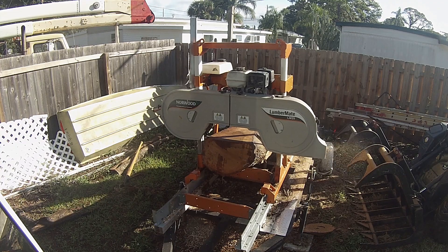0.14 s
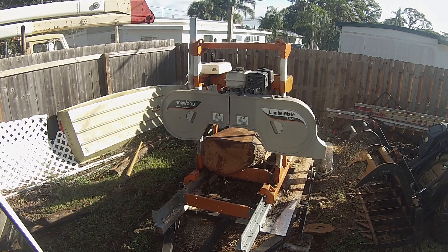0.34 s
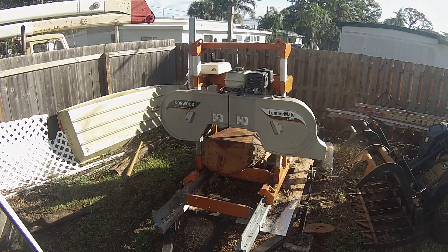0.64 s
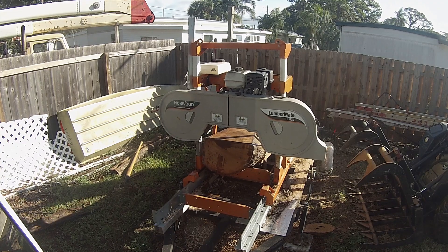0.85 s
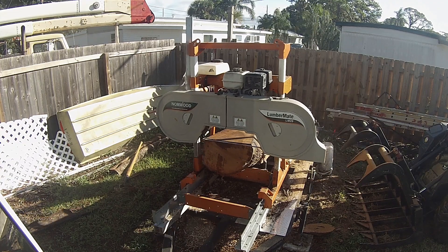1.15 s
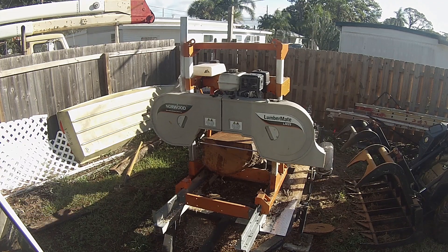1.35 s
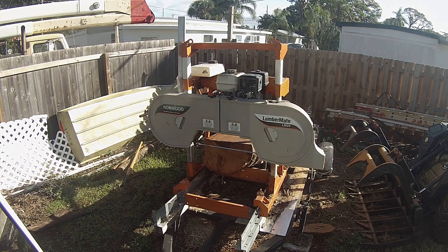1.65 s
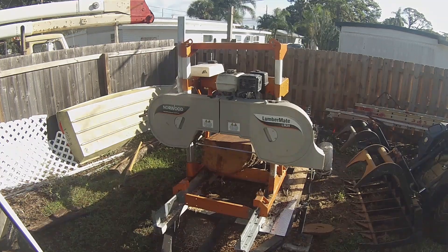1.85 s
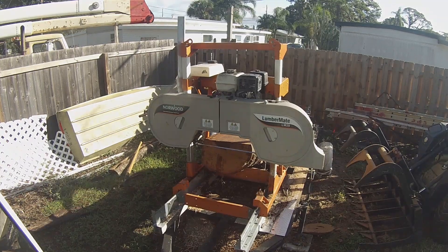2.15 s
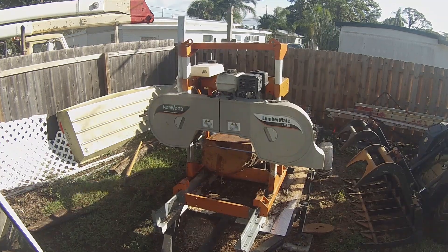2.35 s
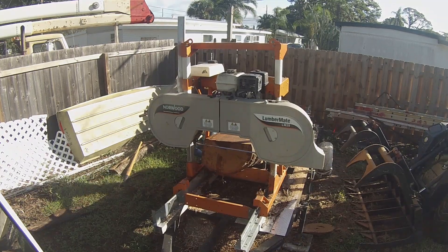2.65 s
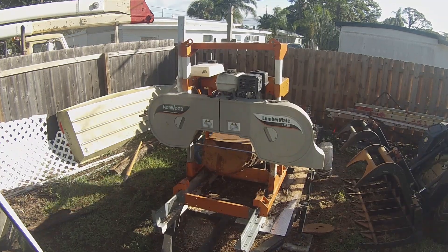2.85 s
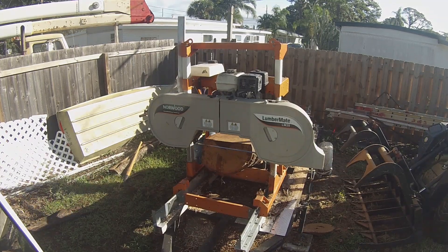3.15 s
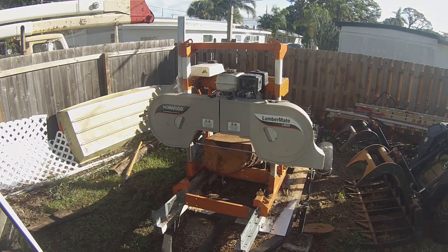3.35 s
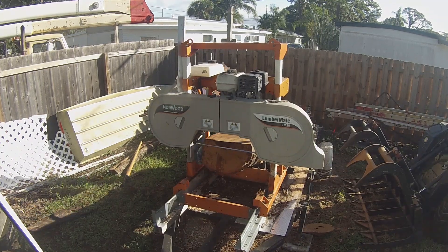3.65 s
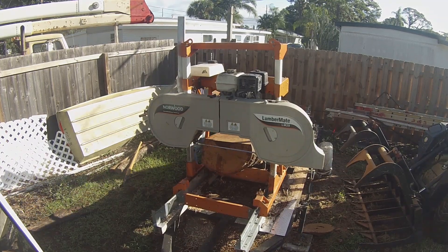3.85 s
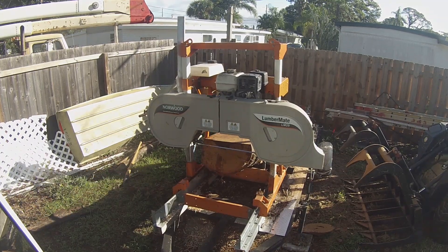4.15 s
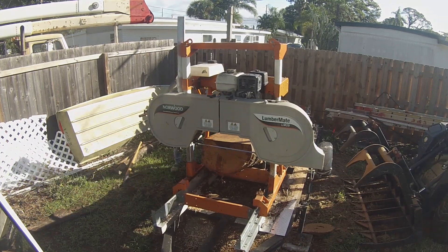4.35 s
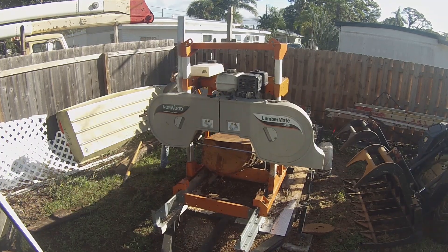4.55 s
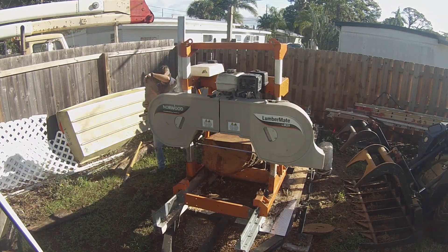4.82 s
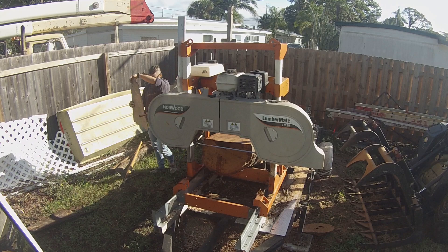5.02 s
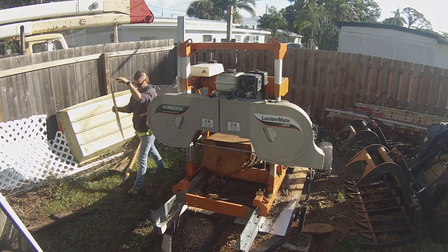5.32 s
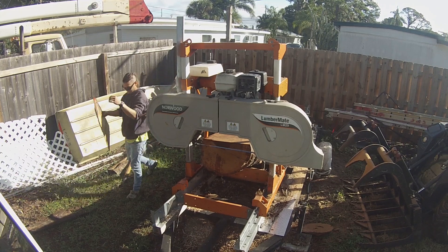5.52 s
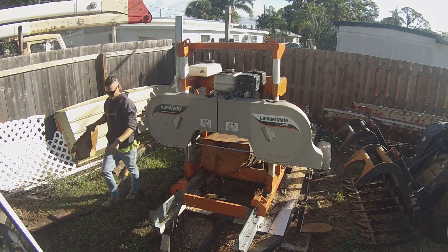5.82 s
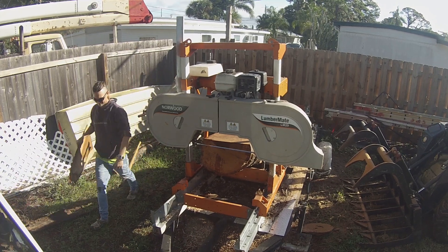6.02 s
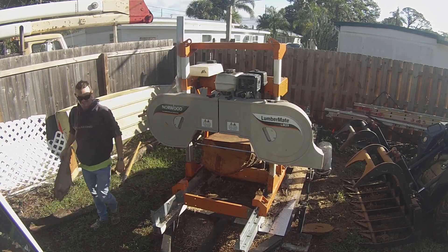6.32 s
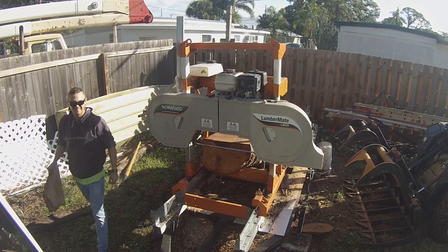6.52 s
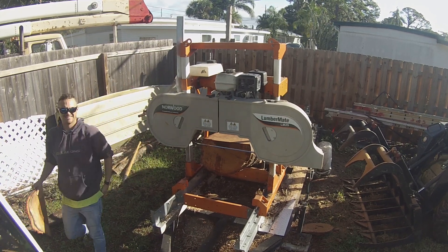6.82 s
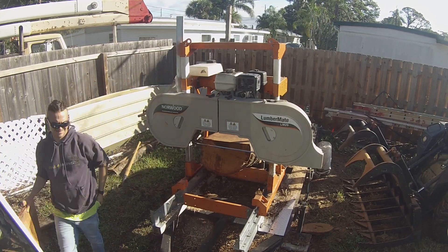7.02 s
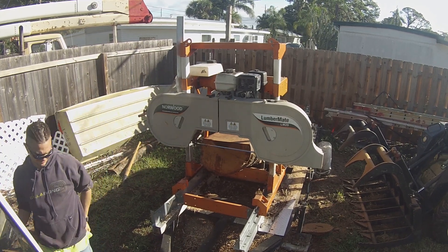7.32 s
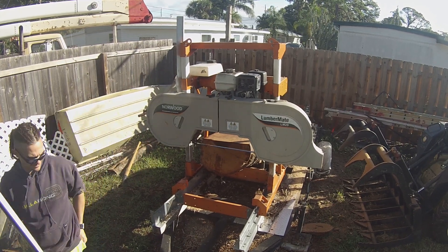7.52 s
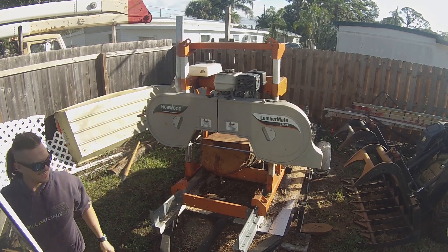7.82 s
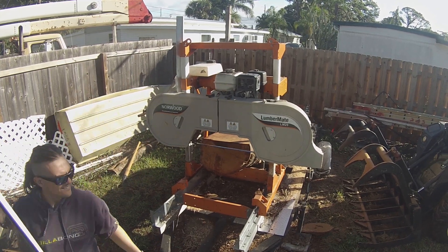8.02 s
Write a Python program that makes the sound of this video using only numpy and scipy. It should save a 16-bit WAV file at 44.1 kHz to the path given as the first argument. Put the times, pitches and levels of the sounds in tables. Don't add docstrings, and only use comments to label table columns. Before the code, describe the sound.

Quiet sawing hiss and engine drone slow, then cut abruptly to a close, rattling single-cylinder idle with wind thumps on the microphone.

```python
import sys
import numpy as np
from scipy import signal
from scipy.fft import rfft, irfft, next_fast_len
from scipy.io import wavfile
from scipy.ndimage import uniform_filter1d

SR = 44100
rng = np.random.default_rng(int(sys.argv[2]) if len(sys.argv) > 2 else 0)


def unload_audio(sound):
    columns = np.transpose(np.atleast_2d(sound))
    steps = np.round(np.clip(columns, -1, 1) * 32767)
    wavfile.write(sys.argv[1], SR, steps.astype(np.int16))


def nominal_scale(level):
    x = np.asarray(level, float) / 20
    return 10 ** x


N = 360285

CHANGE_S = 1.8375

# time_s, rate_firings_per_s
CUT_SPEED = [
    (0, 29.2),
    (.35, 29.5),
    (.7, 29.1),
    (1.0, 29.4),
    (1.18, 29.5),
    (1.37, 26.1),
    (1.47, 23.3),
    (1.83, 19.1),
]
# multiple, level_db
CUT_ORDERS = [(1, -15), (2, -2), (4, -13), (5, 0), (6, -2), (8, -8), (10, -6), (11, -2), (12, -5), (20, -1),
              (24, -8), (40, -9)]
# pitch_hz, level_db (per Hz)
CUT_ROAR_SPECTRUM = [(30, -18), (60, -14), (95, -29), (150, -1.5), (230, -4.5), (330, 0.5), (420, -6),
                     (590, 1), (660, -6), (740, -4), (1000, -8.5), (1170, -5), (1500, -13), (2600, -28)]
# pitch_hz, level_db (per Hz)
CUT_HISS_SPECTRUM = [(1410, -38), (2400, -31), (2660, -7), (2740, -6), (2970, -3), (3130, -1), (4020, -5.5),
                     (5130, -14.5), (6700, -4), (7410, -10.5), (9980, -6), (13900, -15), (15600, -23)]
# centre_s, level_db, length_s
BITE = [
    (.82, 1.5, 0.054),
    (.97, 1.5, .03),
    (1.2, -2, 0.22),
]

# pitch_hz, level_db (per Hz)
WIND_SPECTRUM = [(12, -14), (24, 0), (45, 0), (70, -5), (100, -7), (200, -15), (400, -30)]
# centre_s, level_db (peak), length_s
GUSTS = [(1.35, -65, .25), (1.93, -34, .03), (2.05, -33, .04), (2.2, -36, .06), (2.37, -24, 0.038),
         (2.62, -36, 0.065), (3.33, -36, .04), (3.43, -28, 0.023), (3.92, -42, 0.068), (4.225, -20.5, .015),
         (4.46, -27.5, 0.059), (4.62, -30.5, .06), (5.02, -40, 0.083), (5.24, -30, .03), (5.35, -25, 0.032),
         (5.5, -22.5, 0.05), (5.68, -36, .03), (6.34, -40, .03), (6.86, -31, .07), (7.02, -26, 0.019),
         (7.15, -29, 0.076), (7.33, -30, 0.041), (7.52, -34, 0.058), (7.66, -27, .03), (7.76, -28, 0.06),
         (7.87, -22, 0.038), (8.0, -24.5, 0.047), (8.13, -34, 0.024)]

# time_s, lead_ms (firings ahead of an even beat)
GOVERNOR_LEAD = [(1.95, -13.4), (2.8, -9.1), (3.4, -9.0), (3.85, -6.9), (4.25, -4.2), (4.5, -4.1),
                 (4.95, -5.5), (5.3, -5.0), (5.75, -4.7), (6.5, -7.5), (6.95, -8.2), (7.55, -8.1),
                 (7.95, -9.7)]
# share_of_cycle, level_db
THUMPS = [
    (.955, 0),
    (.32, -12),
    (.56, -19),
]
# pitch_hz, width_hz, level_db
CHAMBER = (156, 88, -28.0)
# share_of_cycle, level_db
GAS_PULSES = [
    (.05, 0),
    (.17, -9),
    (.41, -14),
    (.68, -4),
]
# pitch_hz, level_db, t60_s
PIPE_MODES = [(269.5, -1.5, 0.2), (315.6, 4, 0.057), (326.5, 11.5, 0.086), (313.5, 9, 0.03),
              (417, -6.5, 0.12), (543.3, -5.5, 0.18), (558, -1, 0.11), (582, -0.5, 0.15), (694, -3.5, 0.11),
              (737, -10.5, 0.3), (811.5, -12.5, 0.14), (1155.5, -4.5, 0.22), (1250, -18, 0.062)]
# multiple, level_db (at the change), growth_db_per_s, loudest_share_of_cycle
FRAME_ORDERS = [(13, -33.5, .55, .6), (20, -38, .7, .8), (25, -43, -.8, .55)]
# pitch_hz, width_hz, level_db (at the change), growth_db_per_s
PANELS = [(826, 12, -45, 0), (1036, 8, -39.5, 0), (1145, 16, -40.5, 0), (2095, 60, -51, 1.2),
          (3480, 50, -50, .3), (3965, 35, -53, .3)]
# pitch_hz, level_db (per Hz)
RUMBLE_SPECTRUM = [(60, -14), (90, -13), (165, -11), (220, -6), (290, -6), (345, -4), (395, -12), (470, -7),
                   (525, -5), (565, 0), (630, -5), (730, -3), (820, -6), (900, -12)]
# pitch_hz, level_db (per Hz)
CASING_SPECTRUM = [(500, -25), (850, -0.5), (953, 5.5), (1020, 7.5), (1160, 7), (1250, 7), (1460, 6.5),
                   (1590, -1.5), (1790, -4.5), (2090, -7.5), (2360, -9.5), (2650, -16), (2800, -9.5),
                   (3640, -13), (6160, -120)]
# share_of_cycle, rattle_ms, cover_db, cowl_db
VALVE_CONTACTS = [(.12, 2, -7, -6), (.2, 3, -6, -9), (.295, 3, -5, 0), (.35, 3, -3, -6), (.48, 2, -7, -5),
                  (.56, 3, 0, -7), (.62, 3, -3, -4), (.8, 3, -6, -1), (.845, 4, -1, -4)]
# pitch_hz, width_hz, level_db
SHROUD_MODES = [(2090, 160, -8), (3100, 250, -2), (3430, 220, 0), (3960, 100, -7), (6170, 70, 0),
                (6350, 300, -6), (8770, 50, -6), (9060, 200, -1), (9350, 300, -3), (10500, 400, -3),
                (11100, 500, -7), (10120, 70, .5), (9800, 500, -15)]
# centre_s, level_db, length_s
SHAKES = [(1.95, -4, 0.059), (2.55, 2.5, 0.041), (2.82, -3, 0.086), (3.3, -2.5, 0.065), (3.45, 4.5, 0.018),
          (3.67, -9.5, 0.055), (4.05, -6.5, 0.079), (4.36, -8, .07), (4.55, 4.5, 0.046),
          (5.29, -3.5, 0.038), (6.62, -4, 0.042), (7.2, 4.5, 0.017), (8.0, -2.5, 0.03), (8.12, 3.5, 0.05)]
# pitch_hz, level_db (per Hz)
FAN_BLADE_SPECTRUM = [(1470, -69), (2500, -15), (2690, -15.5), (3190, -4), (5170, -18), (5690, -19.5),
                      (6160, -8), (7540, -15), (9110, -9), (9680, -14), (10900, -9.5), (12500, -29.5),
                      (16200, -53), (22000, -120)]
# pitch_hz, level_db (per Hz)
RUB_SPECTRUM = [(10000, -14), (11500, -3), (13300, 0), (14200, -3), (15600, -4)]


def seconds():
    return np.arange(N) / SR


def since_change():
    return seconds() - CHANGE_S


def rms_one(x):
    return x / np.sqrt(np.mean(x ** 2) + 1e-20)


def in_time(rows):
    time_s, *columns = np.transpose(rows)
    return [np.interp(seconds(), time_s, column) for column in columns]


def drift(rate):
    r = np.exp(-80 * np.pi * rate / SR)
    noise = rng.standard_normal(N // 40 + 2002)
    slow = signal.lfilter([1], [1, -2 * r, r * r], noise)[2000:]
    return np.interp(np.arange(N) / 40, np.arange(len(slow)), rms_one(slow))


def swells(rows, gain):
    t = np.arange(0, N + 40, 40) / SR
    total = sum(gain(size) * np.exp(-.5 * ((t - centre_s) / max(length_s, .01)) ** 2)
                for centre_s, size, length_s in rows)
    return np.interp(seconds(), t, total)


def coloured(spectrum):
    hz, db = np.transpose(spectrum)
    size = next_fast_len(N)
    bins = np.arange(1, size // 2 + 2) * SR / size
    gain = nominal_scale(np.interp(np.log(bins), np.log(hz), db, left=-90, right=-90))
    return rms_one(irfft(rfft(rng.standard_normal(size)) * gain, size)[:N])


def resonate_twice(x, hz, width):
    r = np.exp(-np.pi * width / SR)
    poles = [1, -2 * r * np.cos(2 * np.pi * hz / SR), r * r]
    for _ in range(2):
        x = signal.lfilter([1, 0, -1], poles, x) * (1 - r * r) / 2
    return x


def strikes(cycles, share, level_db, uneven_db):
    at = np.searchsorted(cycles, np.arange(-6, 120) + share)
    clicks = np.full(N + 1, 1e-18)
    clicks[at] = nominal_scale(level_db + uneven_db * rng.standard_normal(len(at)))
    return clicks[:N]


def cutting():
    per_s, = in_time(CUT_SPEED)
    cycles = np.cumsum(per_s) / SR
    slower_db = 20 * np.log10(per_s / 29.3)
    bite_db = swells(BITE, float)
    tones = np.zeros(N)
    for multiple, level_db in CUT_ORDERS:
        fall = 8.0 if multiple > 2 else 14.0
        order_db = level_db + fall * slower_db + 2.5 * drift(10)
        tones += nominal_scale(order_db) * np.sin(2 * np.pi * (multiple * cycles + rng.random()))
    throb_db = 0.49 * np.cos(2 * np.pi * cycles) + 0.74 * drift(25)
    roar_db = -46 + 1.84 * slower_db + 1.1 * bite_db + throb_db
    lap_db = 0.7 * np.cos(2 * np.pi * 4.3 * (seconds() - 0.1))
    hiss_db = -60.5 + 1.2 * slower_db + bite_db + lap_db + 0.84 * drift(30)
    roar = nominal_scale(roar_db) * coloured(CUT_ROAR_SPECTRUM)
    hiss = nominal_scale(hiss_db) * coloured(CUT_HISS_SPECTRUM)
    return nominal_scale(-53.5) * tones + roar + hiss


def wind():
    rumble = coloured(WIND_SPECTRUM)
    rumble = rumble / np.sqrt(uniform_filter1d(rumble ** 2, size=2500) + .05)
    calm = np.where(since_change() > 0, nominal_scale(-49.0), nominal_scale(-72.0))
    level = calm + swells(GUSTS, nominal_scale)
    return level * nominal_scale(2.3 * drift(33)) * rumble


def thump(cycles):
    hz, width, level_db = CHAMBER
    firing = sum(strikes(cycles, share, db, uneven_db=1.1) for share, db in THUMPS)
    push = signal.lfilter(np.hanning(130), 1, firing)
    late = np.roll(push, int(.012 * SR))
    low = nominal_scale(-15.0) * resonate_twice(late, 82.5, 59) + nominal_scale(-15.5) * resonate_twice(late, 55, 33)
    return nominal_scale(level_db) * rms_one(resonate_twice(push, hz, width) + low)


def exhaust(cycles):
    out = np.zeros(N)
    for k, (hz, level_db, t60_s) in enumerate(PIPE_MODES):
        clicks = sum(strikes(cycles, share, level_db + db, uneven_db=1.2) for share, db in GAS_PULSES)
        r = nominal_scale(-60 / (t60_s * SR))
        w = 2 * np.pi * hz / SR
        ring = signal.lfilter([0, np.sin(w)], [1, -2 * r * np.cos(w), r * r], clicks)
        out += (-1) ** k * ring
    return rms_one(out)


def frame_hum(cycles):
    out = np.zeros(N)
    for multiple, db, db_per_s, share in FRAME_ORDERS:
        level = nominal_scale(db + db_per_s * since_change() + 1.2 * drift(1.0))
        throb = 1 + .4 * np.cos(2 * np.pi * (cycles - share))
        out -= level * throb * np.sqrt(2) * np.cos(2 * np.pi * multiple * cycles)
    shake = rng.standard_normal(N)
    for hz, width, db, db_per_s in PANELS:
        out += nominal_scale(db + db_per_s * since_change()) * rms_one(resonate_twice(shake, hz, width))
    return out


def casing_roar(cycles):
    body_db = -23.5 + 0.2942 * since_change() + 2.34 * drift(0.5)
    swell_db = 1.5 * np.cos(2 * np.pi * (cycles - .2)) + .7 * drift(30)
    noise = nominal_scale(-6) * coloured(RUMBLE_SPECTRUM) + nominal_scale(-8.0) * coloured(CASING_SPECTRUM)
    return nominal_scale(body_db + swell_db) * noise


def valve_rattle(cycles):
    shake_db = swells(SHAKES, float) + 0.46 * drift(4.2)
    cover, cowl = np.full((2, N), nominal_scale(-13.5))
    for share, rattle_ms, cover_db, cowl_db in VALVE_CONTACTS:
        clicks = strikes(cycles, share, 0, uneven_db=2.5)
        burst = signal.lfilter([1], [1, -np.exp(-1000 / (rattle_ms * SR))], clicks)
        cover = cover + nominal_scale(cover_db) * burst
        cowl = cowl + nominal_scale(cowl_db) * burst
    loose, firm = nominal_scale(shake_db), nominal_scale(0.55 * shake_db)
    out = np.zeros(N)
    for hz, width, level_db in SHROUD_MODES:
        if hz > 9700:
            gate = loose * cowl
        elif hz > 5000:
            gate = loose * cover
        else:
            gate = firm * (nominal_scale(-14.5) + cowl / 2)
        chatter = gate * nominal_scale(1.5 * drift(27)) * rng.standard_normal(N)
        out += nominal_scale(level_db) * resonate_twice(chatter, hz, width)
    return nominal_scale(-33.0) * rms_one(out)


def blade_rub():
    start_rate, slowing = 3.53, .72
    rate = np.maximum(start_rate - slowing * (seconds() - 1.88), 0)
    turn = 2 * np.pi * (start_rate ** 2 - rate ** 2) / (2 * slowing)
    shape = np.cos(turn - .3) + .4 * np.sin(2 * turn + .6)
    level_db = -52.0 + rate * (1.3 + 1.0 * shape) + .6 * drift(3)
    return nominal_scale(level_db) * coloured(RUB_SPECTRUM)


def fan_and_blade(cycles):
    flutter_db = 1.2 * np.cos(4 * np.pi * (cycles - .33)) + 1.6 * drift(90)
    return nominal_scale(flutter_db) * (nominal_scale(-34.5) * coloured(FAN_BLADE_SPECTRUM) + blade_rub())


def idling():
    lead_ms, = in_time(GOVERNOR_LEAD)
    cycles = 18.1 * (seconds() - 2 + lead_ms / 1000)
    firings = thump(cycles) + nominal_scale(-27.0) * exhaust(cycles) + frame_hum(cycles)
    return firings + casing_roar(cycles) + valve_rattle(cycles) + fan_and_blade(cycles)


def scene():
    second = np.clip(since_change() / .002, 0, 1)
    return ((1 - second) * cutting() + second * idling() + wind())[None]


def roll_off(x):
    return signal.sosfilt(signal.butter(12, 16110, fs=SR, output="sos"), x)


def record(dry):
    steep = signal.ellip(12, .5, 55, 15260, fs=SR, output="sos")
    mix = signal.sosfilt(steep, dry)
    return roll_off(mix)


dry = scene()
out = record(dry)
unload_audio(out)
```